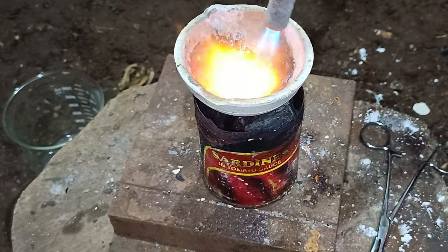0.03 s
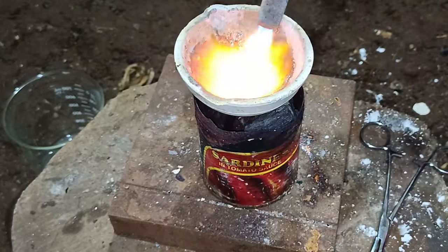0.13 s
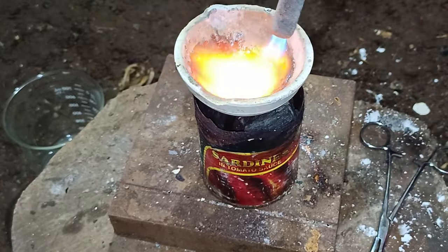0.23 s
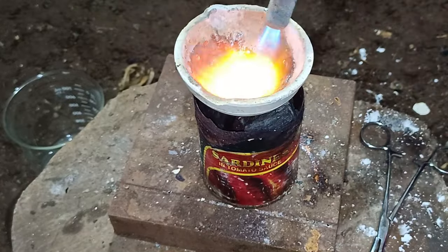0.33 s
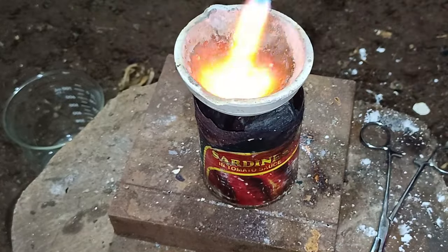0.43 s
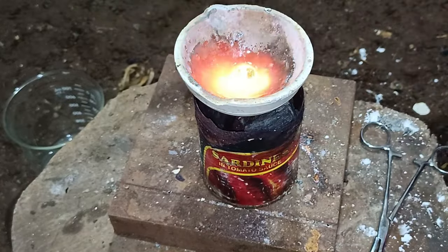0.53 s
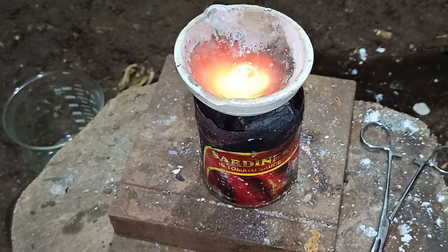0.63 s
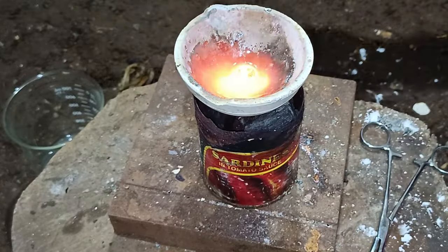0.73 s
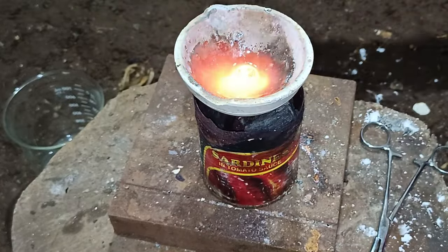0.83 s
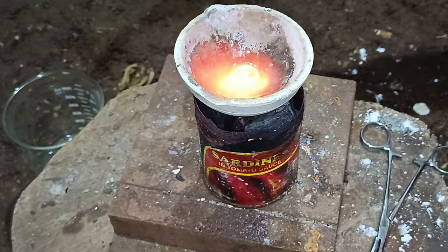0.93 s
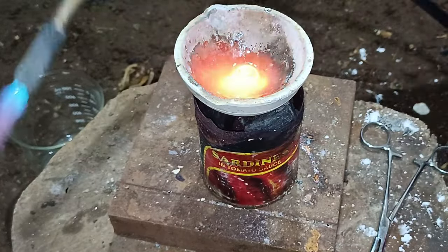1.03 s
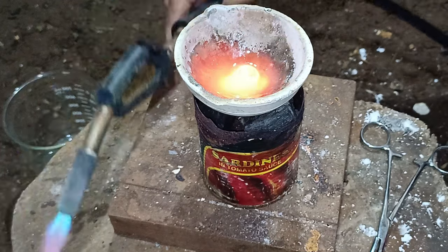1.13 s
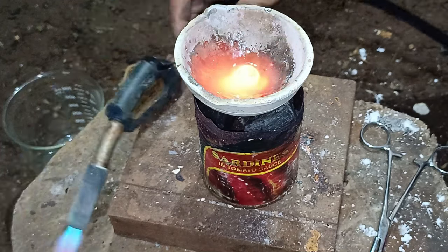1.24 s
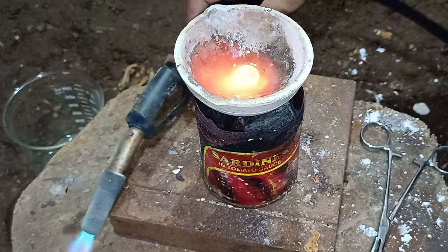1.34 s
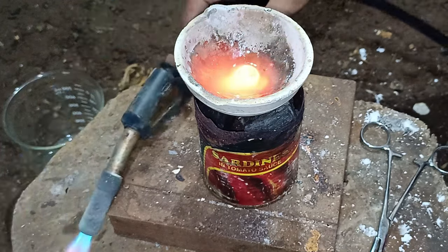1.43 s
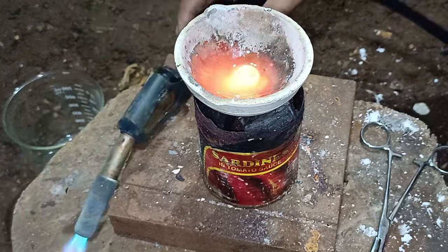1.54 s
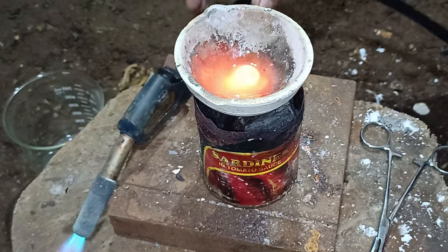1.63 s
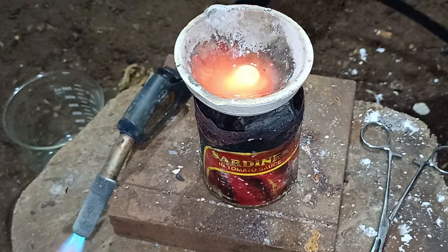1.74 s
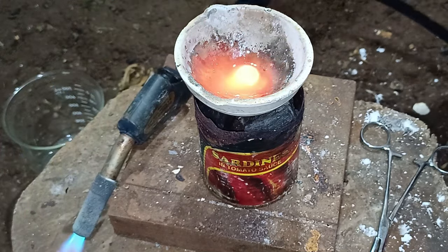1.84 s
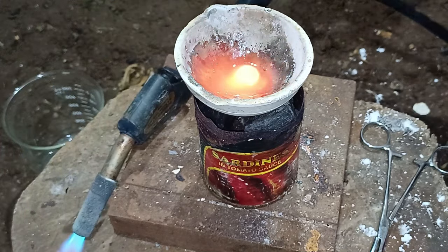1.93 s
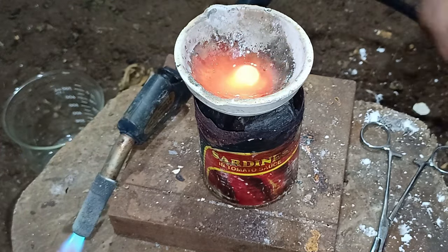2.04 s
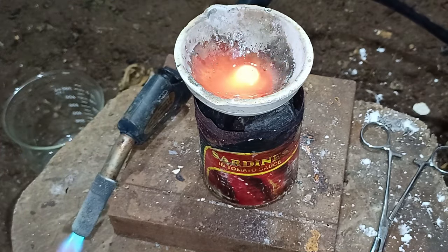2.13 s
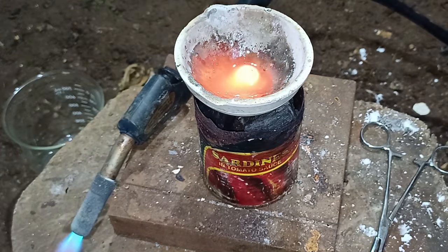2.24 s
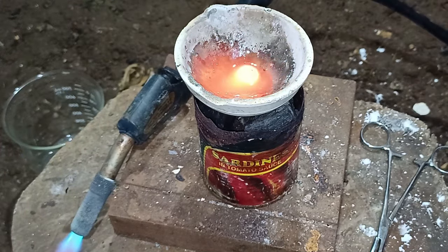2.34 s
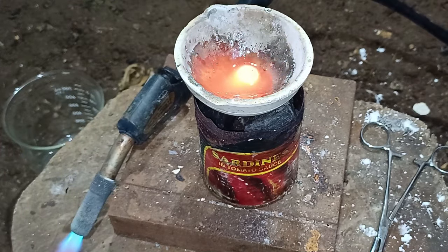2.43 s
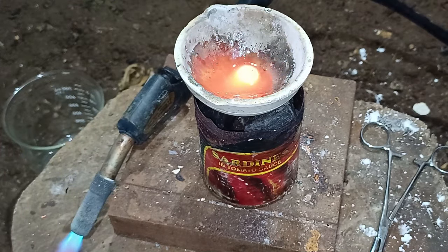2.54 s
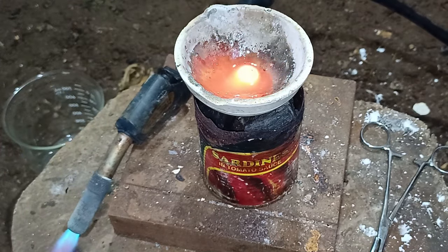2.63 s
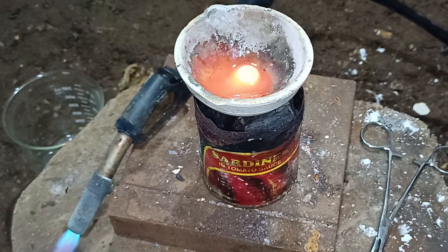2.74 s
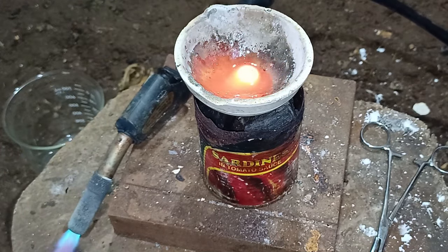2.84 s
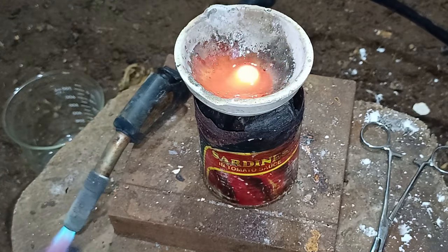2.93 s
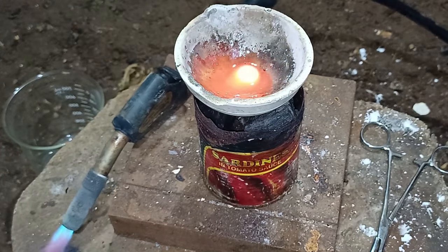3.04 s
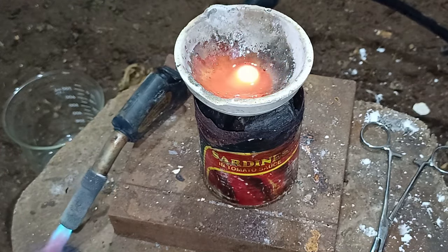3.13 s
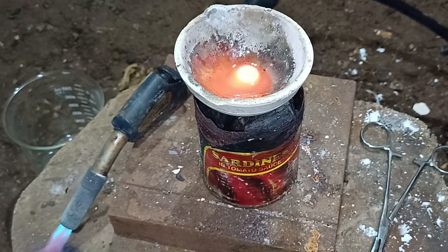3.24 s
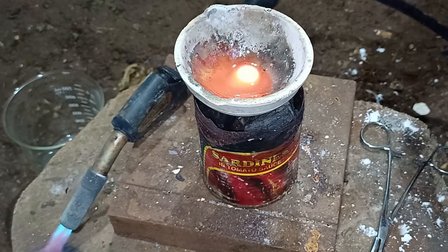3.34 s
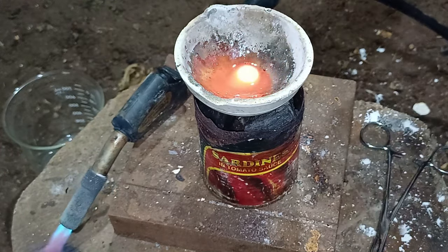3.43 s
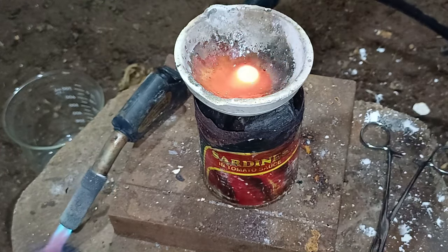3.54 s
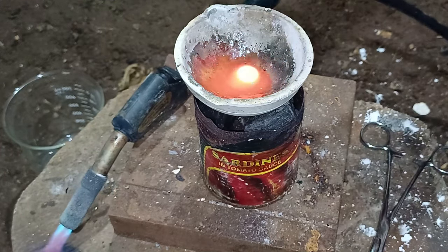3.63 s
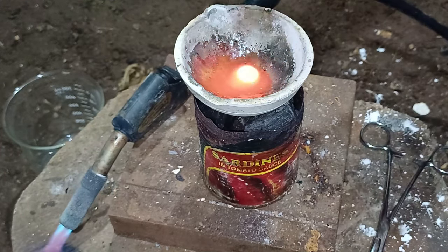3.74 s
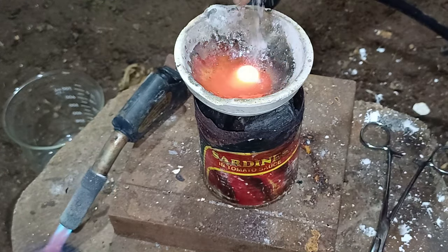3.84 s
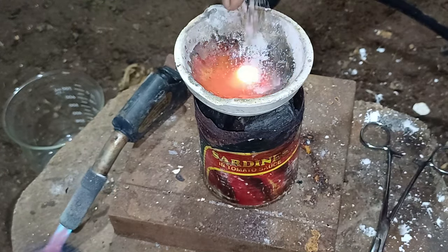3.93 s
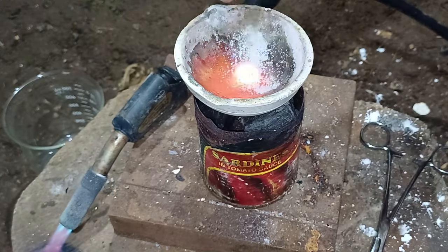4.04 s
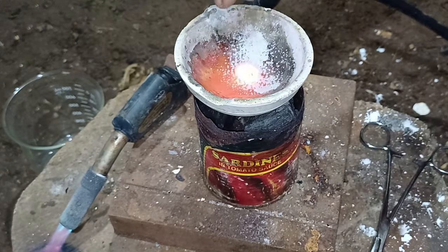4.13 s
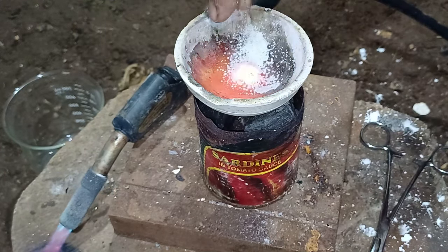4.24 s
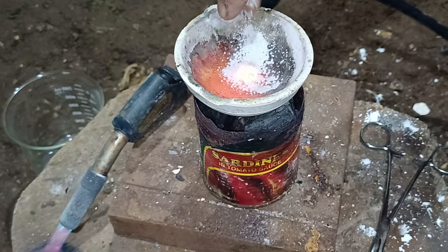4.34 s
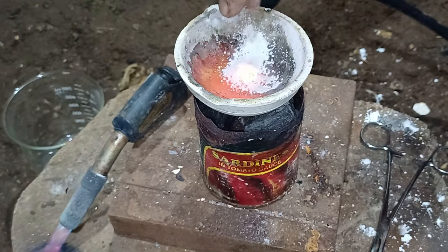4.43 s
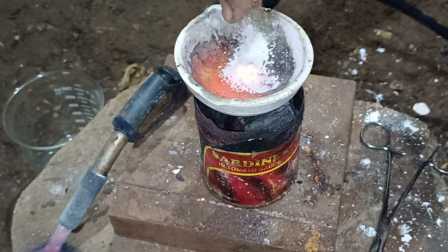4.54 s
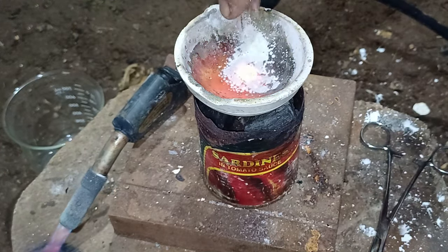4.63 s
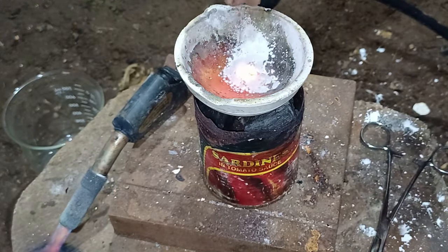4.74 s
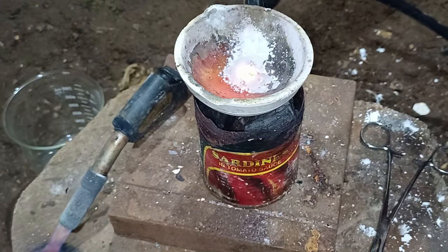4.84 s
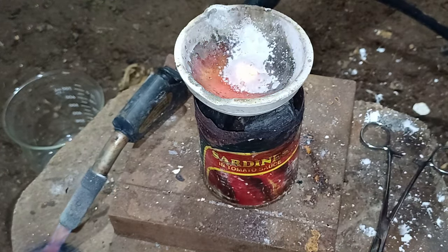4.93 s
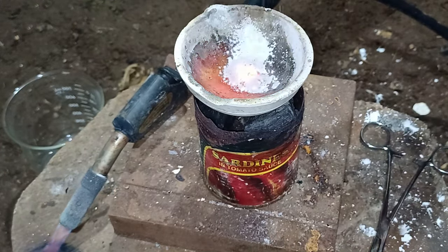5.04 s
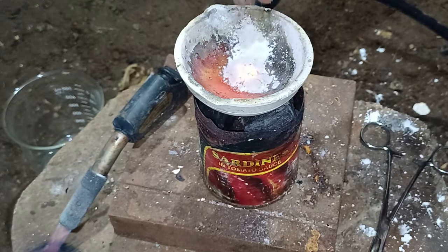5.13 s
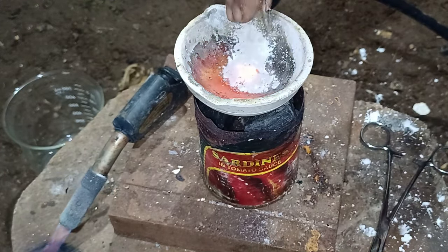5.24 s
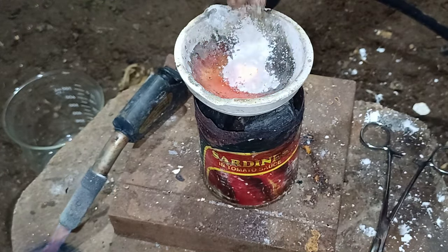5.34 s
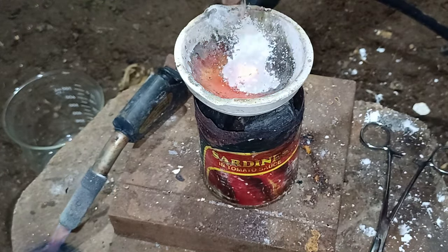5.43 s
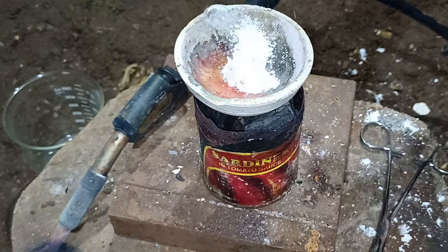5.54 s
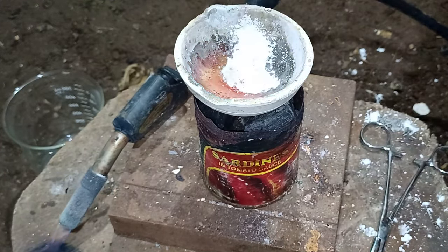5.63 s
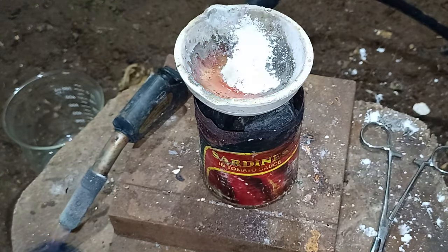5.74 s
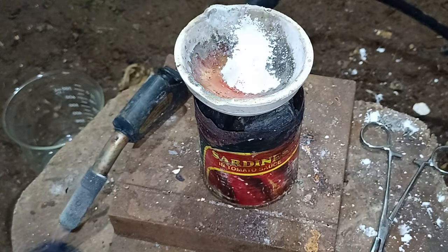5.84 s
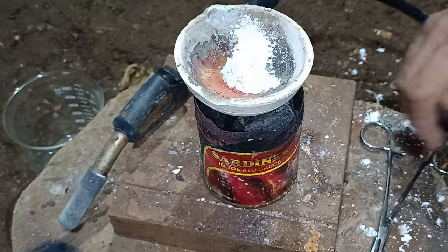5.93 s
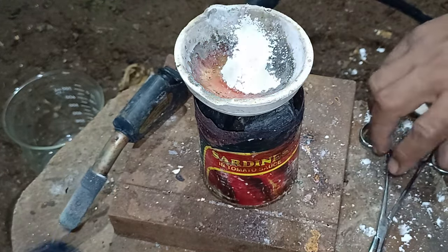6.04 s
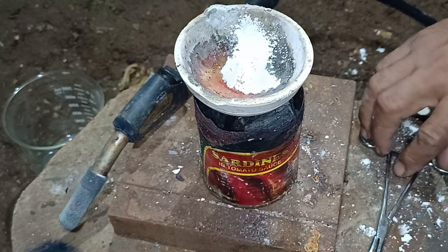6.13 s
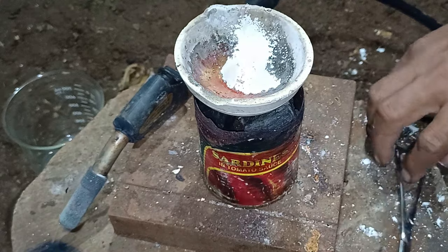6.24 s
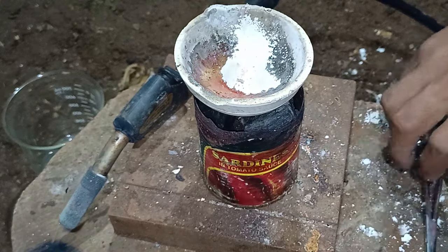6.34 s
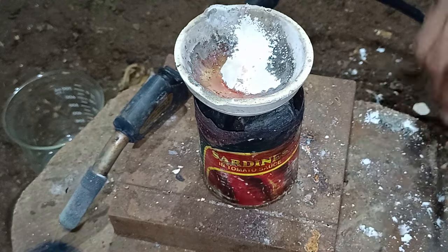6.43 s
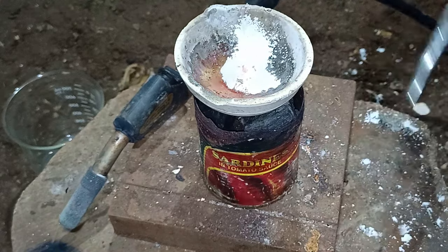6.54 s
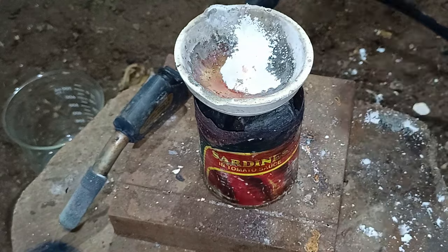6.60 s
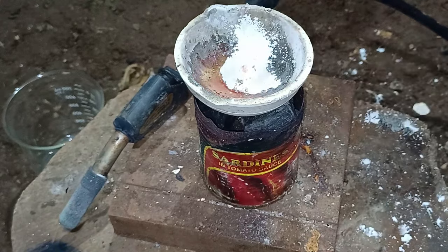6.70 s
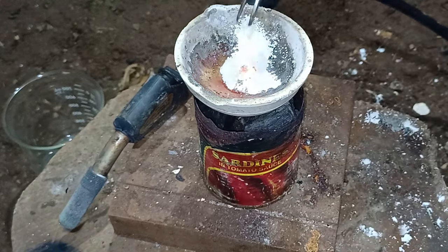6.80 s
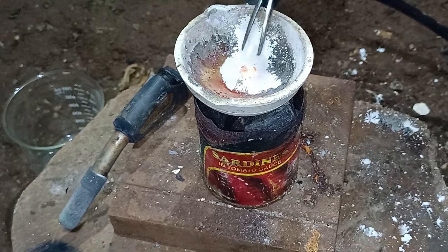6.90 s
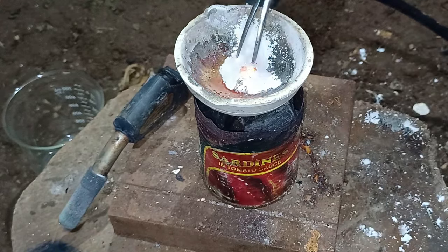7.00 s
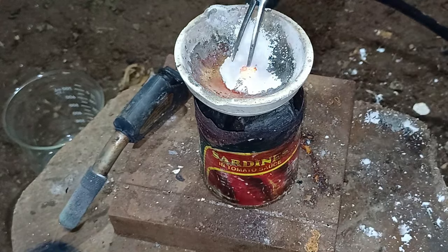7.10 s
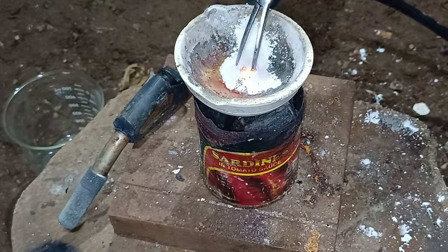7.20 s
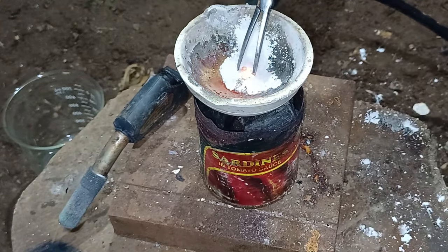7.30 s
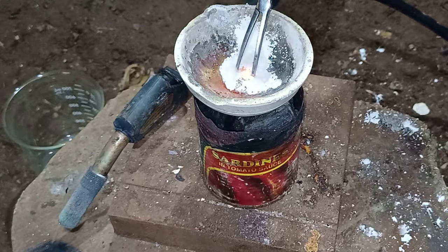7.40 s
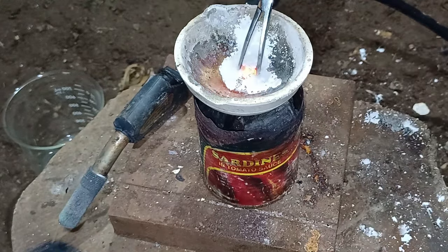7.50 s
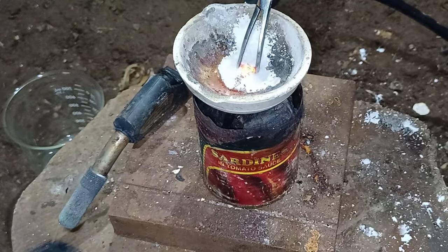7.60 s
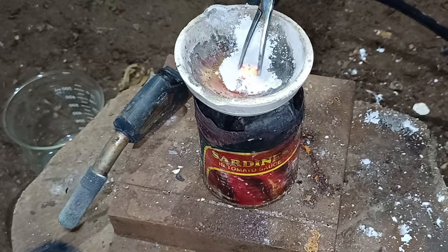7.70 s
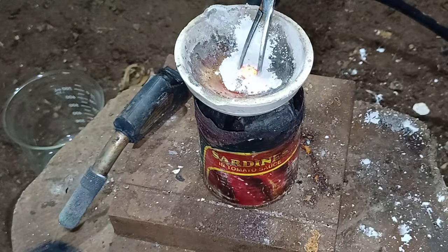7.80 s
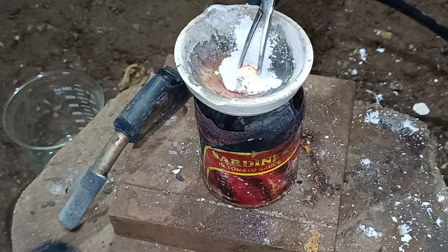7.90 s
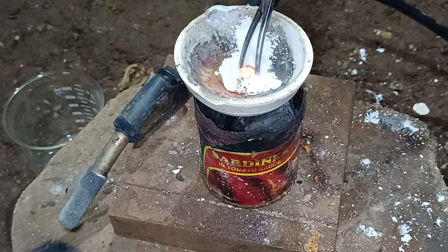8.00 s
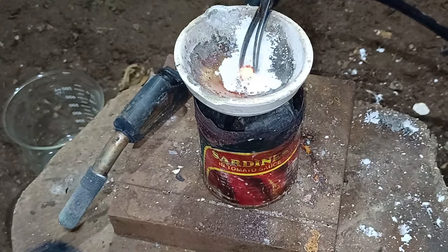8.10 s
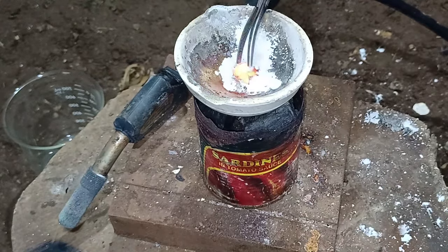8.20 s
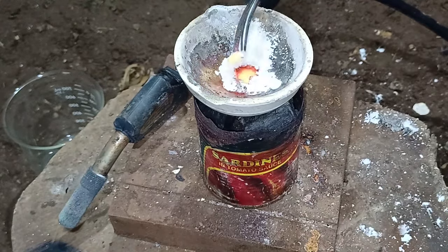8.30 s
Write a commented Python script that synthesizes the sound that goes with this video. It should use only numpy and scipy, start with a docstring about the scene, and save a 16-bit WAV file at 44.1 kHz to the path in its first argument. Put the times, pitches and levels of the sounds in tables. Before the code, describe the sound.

A gas torch roars into a crucible outdoors, close by, with a churning, flickering rush and a bright hiss. At about 0.5 seconds it spits and is swung away, turning quieter and sweeping in colour, then settles on the ground by 1.3 seconds and burns steadily. From 2.3 seconds the flame sinks, dulls and starts to flutter, with a weak, breathy note from the burner tube after 3 seconds. At 4 seconds the whole sound abruptly steps louder. The flame puffs at 4.5 seconds, and a clean, slightly falling whistle grows from 4.8 until the roar dies at 5.2 seconds. A thin, bright hiss and a low, uneven hum continue to the end, around 8.4 seconds. Tongs are picked up near 6 seconds with a deep thud, soft dull knocks and a faint scrape. More deep thuds, light scrapes and rustling come between 7.7 and 8.2 seconds.

```python
"""A gas torch roars into a crucible, then is swung away and laid on the ground. Its flame is churning
noise, coloured by the space around it. As the gas runs down the flame sinks and flutters, the whole
sound steps up, the burner tube whistles and the roar dies. A thin hiss and a low, uneven hum stay on,
with a few deep thuds and the soft knocks and scrapes of the tongs."""
import sys
import numpy as np
from scipy import signal
from scipy.fft import rfft, irfft, next_fast_len
from scipy.io import wavfile
from scipy.ndimage import uniform_filter1d

SR = 44100
rng = np.random.default_rng(int(sys.argv[2]) if len(sys.argv) > 2 else 0)


def generate_wav(signal):
    """Clip the signal to [-1, 1] and save it as 16-bit WAV at the path in sys.argv[1]."""
    frames = np.transpose(np.atleast_2d(signal))
    scaled = np.clip(frames, -1, 1) * 32767
    pcm = np.round(scaled).astype(np.int16)
    wavfile.write(sys.argv[1], SR, pcm)


N = 368676
TIME = np.arange(N) / SR
FFT_SIZE = 2 * next_fast_len(N // 2 + 1)
FREQ = np.maximum(np.fft.rfftfreq(FFT_SIZE, 1 / SR), 1)
SIDES = np.array([[1], [-1]])  # left, right: a positive pan_db is louder on the left
CUTOFF_HZ = 15900
# how much later each sound reaches the right side than the left
CRUCIBLE_LAG_S, AIR_LAG_S, FLAME_LAG_S, HISS_LAG_S = 0.0001, 0.00016, 0.00013, 0.00006

# the torch's path: time_s, place (0 crucible, 1 open air, 2 lowered, 3 ground), echo_delay_s, echo_gain
SWING = [(.41, 0.0, 0.004, .03), (.57, 0.87, 0.0042, .18), (.76, 1.0, 0.0044, 0.3), (.87, 1, .0042, 0.18),
         (.97, 2, 0.0039, .15), (1.09, 2, .0032, .17), (1.19, 3, 0.0026, 0.09), (1.33, 3, .0025, .02)]
# how alike left and right are for most noises: pitch_hz, likeness (0 to 1)
LIKENESS = [(60, 0.95), (900, 1), (2500, 0.78), (5000, 0.67), (8000, 0.04), (15000, 0.2)]
# the same for the thin hiss and the rumble around the hum: pitch_hz, likeness (0 to 1)
HISS_LIKENESS = [(170, 0.87), (300, 0.26), (1000, 0.2), (2300, 1), (5000, 0.5), (10000, 0)]


def from_db(db):
    """Turn decibels into a gain to multiply by."""
    return 10 ** (np.asarray(db) / 20)


def rms_one(x):
    """Scale a sound so that the average of its channels has strength (rms) 1."""
    return x / np.sqrt(np.mean(np.atleast_2d(x).mean(0) ** 2) + 1e-20)


def in_time(rows):
    """Join rows of (time_s, values...) into one curve for each value."""
    times, *columns = np.transpose(rows)
    return [np.interp(TIME, times, column) for column in columns]


def at_hz(points):
    """Join rows of (pitch_hz, value) into a curve over all frequencies."""
    hz, value = np.transpose(points)
    return np.interp(np.log(FREQ), np.log(hz), value)


def sounding(rows):
    """1 between the first and last time in a table, else 0."""
    return (TIME >= rows[0][0]) & (TIME <= rows[-1][0])


def ramp(start_s, length_s):
    """0 before the start, then an even rise to 1."""
    return np.clip((TIME - start_s) / length_s, 0, 1)


def swell(middle_s, length_s):
    """A rounded rise from 0 to 1 and back."""
    return np.cos(np.pi * np.clip((TIME - middle_s) / length_s, -0.5, 0.5))


def drift(rate_hz):
    """A smooth random wobble of about size 1, mostly slower than rate_hz."""
    stride, warm_up = 40, 2000
    pole = np.exp(-2 * np.pi * stride * rate_hz / SR)
    white = rng.standard_normal(N // stride + warm_up + 2)
    slow = signal.lfilter([1], [1, -2 * pole, pole * pole], white)[warm_up:]
    return np.interp(np.arange(N) / stride, np.arange(len(slow)), rms_one(slow))


def stereo_phase(hz, lead_rad):
    """The running angle of a moving pitch, with the left side ahead by lead_rad."""
    return 2 * np.pi * np.cumsum(hz) / SR + SIDES * lead_rad / 2


def band(x, low_hz, high_hz):
    """The part of a sound between two frequencies."""
    return irfft(rfft(x, FFT_SIZE) * ((FREQ >= low_hz) & (FREQ < high_hz)))[..., :N]


def resonances(modes):
    """Left and right power at each frequency, with a peak wherever something rings."""
    return sum(from_db(db + SIDES * pan_db / 2) ** 2
               / (1 + (np.sqrt(2) - 1) * (2 * (FREQ - hz) / width_hz) ** 2) ** 2
               for hz, width_hz, db, pan_db in modes)


def hollows(dips):
    """Power at each frequency, with narrow dips where echoes cancel the direct sound."""
    return from_db(sum(db / (1 + (2 * (FREQ - hz) / width_hz) ** 2) ** 2
                       for hz, width_hz, db in dips)) ** 2


def noise(power, lag_s, likeness=LIKENESS, scatter=0.54, scatter_s=0.0062):
    """Stereo noise of strength 1, coloured by a power curve; the left side hears it first."""
    middle, side = rfft(rng.standard_normal((2, FFT_SIZE)))
    alike = np.clip(at_hz(likeness), 0, 1)
    spectrum = np.sqrt(1 + alike) * middle + SIDES * np.sqrt(1 - alike) * side
    # small things nearby reflect the short waves and ripple the spectrum, most around 4 kHz
    echoes = rng.standard_normal((2, N)) * TIME * np.exp(-TIME / scatter_s)
    echoes = echoes / np.linalg.norm(echoes[0])
    ripple = 1 + scatter * np.minimum(FREQ / 4000, 4000 / FREQ) * rfft(echoes, FFT_SIZE)
    delay = np.exp(1j * np.pi * FREQ * lag_s * SIDES)
    return rms_one(irfft(np.sqrt(power) * ripple * spectrum * delay)[:, :N])


def place_shares():
    """How much the flame is in the crucible, in open air, lowered and on the ground, each 0 to 1."""
    place = np.clip(in_time(SWING)[0], 0, 3)
    return np.array([np.maximum(1 - abs(place - k), 0) for k in range(4)])


def drive_db(aim_db=-3.5, aim_s=0.22, run_down_s=2.295, empty_s=5.385):
    """The flame's strength: it grows as it is aimed, holds, then sinks as the gas runs out."""
    flow = np.maximum(1 - ramp(run_down_s, empty_s - run_down_s), 1e-4)
    return 20 * np.log10(flow) + aim_db * (1 - ramp(0, aim_s))


def flame_bands(shares):
    """Burning gas as low rumble, middle roar and high rush, coloured by each place it passes."""
    # resonances of the flame in each place: pitch_hz, width_hz, level_db, pan_db
    in_crucible = [(290, 60, -0.5, 1), (446, 170, 3, 2), (540, 70, -3.5, -6), (827, 52, 0.5, 1),
                   (1120, 160, 1.5, 1), (1460, 300, 1, -1.5), (1730, 170, 2.5, -4), (2284, 146, 4.5, -1.5),
                   (2790, 110, 0, -4), (3080, 810, -0.5, -2.5), (4200, 510, -10, 0),
                   (5650, 8700, -16.5, -5)]
    in_air = [(176, 110, 0, 1), (440, 125, 4.5, 3), (555, 80, 3, -1), (890, 460, -3.5, -0.5),
              (1390, 310, -2.5, -0.5), (2660, 2000, -8, -1.5), (5500, 1300, -17.5, 3)]
    lowered = [(432, 85, 1, 4), (570, 280, -2.5, 0), (1180, 310, -3.5, -1), (1560, 150, -6, 0),
               (2260, 270, -6.5, 1.5), (3580, 1200, -12.5, -2), (5300, 930, -15, 0)]
    on_ground = [(267.5, 50.5, -1.3, 2.5), (434, 93, -3, 2.5), (627, 250, -3.5, 2), (677, 72, 0, 1.5),
                 (920, 120, -8.5, -13.5), (1245, 133, -7.5, 12), (1477, 740, -6.5, -1), (1550, 170, -7, 5),
                 (2170, 66, -8, 13), (2362, 112, -7, -7.5), (3200, 730, -13.5, -8.5), (3540, 270, -17, 9),
                 (4330, 460, -17.5, 0.5), (4900, 860, -18, -2.5), (5700, 410, -18.5, -2.5),
                 (6630, 610, -20, -2)]
    # dips between the resonances on the ground: pitch_hz, width_hz, change_db
    ground_dips = [(325, 51, -6), (773, 62, -4.5), (1012, 100, -4.5), (1870, 89, -2.5)]
    colours = [resonances(in_crucible), resonances(in_air), resonances(lowered),
               resonances(on_ground) * hollows(ground_dips)]
    lags_s = [CRUCIBLE_LAG_S, AIR_LAG_S, AIR_LAG_S, FLAME_LAG_S]
    edges_hz = [(75, 800), (800, 2600), (2600, SR)]
    bands = 0
    for share, colour, lag_s in zip(shares, colours, lags_s):
        burning = noise(colour, lag_s)
        bands += np.sqrt(share) * np.array([rms_one(band(burning, *edges)) for edges in edges_hz])
    return bands


def flame_levels_db(shares):
    """Levels of rumble, roar and rush: with less gas the flame gets quieter and duller."""
    # the flame at full flow, one row for each place: rumble_db, roar_db, rush_db
    place_levels = [(-22, -17, -24.5), (-26, -27, -33.5), (-23.5, -25.5, -31), (-22, -20, -29.5)]
    # decibels gained for each decibel of gas flow: rumble, roar, rush
    flow_slopes = [0.84, 1.55, 1.345]
    # a flare on leaving the crucible, a puff when starved: middle_s, length_s, rumble_db, roar_db, rush_db
    flares = [(0.5, 0.24, 2, 1.3, -4.5), (4.548, 0.033, 3.6, 2.9, 4)]
    # the starved flame draws back into the tube, one row for each band: start_s, length_s, change_db
    retreat = [(4.56, 0.39, -12.5), (4.73, 0.081, 5.5), (4.74, 0.2, 9.5)]
    levels = np.transpose(place_levels) @ shares + np.outer(flow_slopes, drive_db())
    levels += sum(np.outer(db, swell(middle_s, length_s)) for middle_s, length_s, *db in flares)
    levels += np.array([db * ramp(start_s, length_s) for start_s, length_s, db in retreat])
    going_out_db = np.outer([-5, -11, -6], ramp(start_s=5.15, length_s=0.06))
    return levels + going_out_db


def flame(flicker_db=0.92, flutter_db=0.8, splash_db=0.8, band_flicker_db=0.78, shade_db=-5.5):
    """The roar flickers, more so as it splashes in the crucible and as it starves of gas."""
    shares = place_shares()
    bands = flame_bands(shares)
    starved = ramp(start_s=3.5, length_s=1.1)
    wobble_db = flicker_db * drift(51) + flutter_db * starved * drift(43.2)
    wobble_db += splash_db * shares[0] * drift(90)
    roar = sum(part * from_db(db + wobble_db + band_flicker_db * drift(34))
               for part, db in zip(bands, flame_levels_db(shares)))
    # the hand blocks some of the treble until it lets go of the torch
    held = 1 - ramp(start_s=1.48, length_s=0.08)
    roar -= band(roar, 5680, SR) * (1 - from_db(shade_db * held))
    return ground_echoes(roar, airborne=shares[1])


def ground_echoes(roar, airborne, wander=0.022):
    """Echoes off the slab and the ground shift as the torch is carried, sweeping the roar's colour."""
    _, delay_s, gain = in_time(SWING)
    delay_s = delay_s * (1 + wander * airborne * drift(8.7))
    echoes = np.array([np.interp(TIME - delay_s / 2, TIME, side) + np.interp(TIME - delay_s, TIME, side)
                       for side in roar])
    return (roar + gain * echoes) / np.sqrt(1 + 2 * gain ** 2)


def gas_jet(full_flow_db=-37.5, flow_slope=1.56, in_air_db=-1.5, spit_db=5.5, flicker_db=1.43):
    """The nozzle's bright hiss follows the gas flow, and is weaker while swung through the air."""
    # broad peaks of the jet's hiss: pitch_hz, width_hz, level_db, pan_db
    humps = [(7400, 1800, -1.5, -5), (10220, 1700, -0.5, 4), (12700, 3100, 0, 0)]
    jet = noise(resonances(humps), FLAME_LAG_S)
    db = full_flow_db + flow_slope * drive_db() + in_air_db * place_shares()[1]
    db += spit_db * swell(middle_s=0.483, length_s=0.069)  # it spits on crossing the crucible's rim
    return jet * from_db(db + flicker_db * drift(50))


def tube_rush(boost_db=5.5):
    """Gas rushes through the starved burner tube and stirs its resonances."""
    # loudness of the rush before the boost: time_s, level_db
    levels = [(2.9, -48), (3.6, -42), (4.3, -41), (4.74, -51), (4.81, -41.5), (4.99, -46.5), (5.18, -58.5)]
    # resonances of the tube: pitch_hz, width_hz, level_db, pan_db
    modes = [(250, 58, 10.5, 4.5), (907, 81, 14, -9), (2410, 135, 11, 0.5), (4420, 260, 5, -4),
             (5680, 220, 5.5, -3), (5950, 92, 8, 1), (7070, 260, -1, -8)]
    rush = noise(resonances(modes), FLAME_LAG_S)
    return rush * sounding(levels) * from_db(in_time(levels)[0] + boost_db + drift(42))


def tube_tone(waver_hz=16, flicker_db=4.3, pan_db=-3.5):
    """The burner tube sings a weak, breathy note inside the roar."""
    # the course of the note: time_s, pitch_hz, level_db
    note = [(2.9, 996, -52), (3.25, 969.4, -34), (3.6, 941, -36), (3.97, 965.6, -34.5), (4.2, 958, -35),
            (4.39, 934, -32.5), (4.5, 911.4, -49)]
    hz, db = in_time(note)
    gain = sounding(note) * from_db(db + flicker_db * drift(28) + SIDES * pan_db / 2)
    return np.sqrt(2) * gain * np.sin(stereo_phase(hz + waver_hz * drift(40.7), lead_rad=0.71))


def tube_whistle(waver_hz=2.3, flicker_db=0.5, pan_db=-4.5, third_vs_second_db=-16):
    """The tube locks into a clean, falling whistle just before the flame dies."""
    # the course of the whistle: time_s, pitch_hz, level_db, overtone_db (relative to the main note)
    note = [(4.75, 1028, -52, -12), (4.86, 1006, -39, -14), (4.93, 1002, -33.5, -4.5),
            (5.055, 980, -29, -8), (5.095, 970, -27, -26), (5.148, 957, -25.5, -24), (5.185, 944, -51, -30)]
    hz, db, overtone_db = in_time(note)
    phase = stereo_phase(hz + waver_hz * drift(40), lead_rad=0.71)
    overtones = np.sin(2 * phase) + from_db(third_vs_second_db) * np.sin(3 * phase)
    gain = sounding(note) * from_db(db + flicker_db * drift(28) + SIDES * pan_db / 2)
    return np.sqrt(2) * gain * (np.sin(phase) + from_db(overtone_db) * overtones)


def thin_hiss(body_db=-51, top_rustle_db=-3, top_pan_db=0.5, body_pan_db=-1,
              flicker_db=1.34, sway_db=0.5):
    """A smooth, bright hiss outlasts the flame and swells as the tongs rustle."""
    # overall colour of the hiss: pitch_hz, level_db
    colour = [(300, -8), (700, -20), (1400, -10.5), (2000, -5), (3200, -2.5), (4800, -7), (7500, -6.5),
              (8800, -2), (11000, 0.5), (15800, -1.5)]
    # narrow resonances on top of that colour: pitch_hz, width_hz, level_db, pan_db
    peaks = [(1730, 140, 0.5, -10.5), (2290, 95, 7.5, -0.5)]
    # loudness of the top of the hiss: time_s, level_db
    top_levels = [(3.9, -53), (4.02, -46), (5.0, -44.5), (5.7, -47.5), (8.36, -46)]
    # the tongs are picked up and worked in the powder: middle_s, length_s, level_db
    rustles = [(6.2, 0.53, -57), (8.018, 0.92, -50.5)]
    hiss = noise(from_db(at_hz(colour)) ** 2 * (1 + resonances(peaks)), HISS_LAG_S, HISS_LIKENESS)
    rustle = sum(from_db(db) * swell(middle_s, length_s) for middle_s, length_s, db in rustles)
    body = rms_one(band(hiss, 0, 6000)) * from_db(SIDES * body_pan_db / 2)
    body *= np.hypot(from_db(body_db), rustle)
    top = rms_one(band(hiss, 6000, CUTOFF_HZ)) * from_db(SIDES * top_pan_db / 2)
    top *= np.hypot(from_db(in_time(top_levels)[0]), from_db(top_rustle_db) * rustle)
    return (top + body) * from_db(flicker_db * drift(75) + sway_db * drift(10.4))


def hum(tone_db=-1.1, rough_db=-2, rumble_db=-47, rumble_follows=0.29,
        waver_hz=2.45, uneven_db=1.4, pan_db=1):
    """A low hum in a wide rumble: rough at first, it clears to a wavering tone as the flame weakens."""
    # swells of the hum: time_s, level_db
    levels = [(3.96, -36.5), (4.51, -47), (4.55, -29), (4.63, -37), (4.72, -33), (4.98, -41.5),
              (5.3, -47.5), (5.55, -44.5), (5.85, -53), (6.0, -41), (6.22, -40), (6.27, -51), (6.35, -36.5),
              (6.41, -46), (6.5, -37), (6.55, -51), (6.6, -32), (6.66, -39), (6.7, -34), (6.87, -36.5),
              (7.02, -31.5), (7.1, -41.5), (7.25, -50), (7.44, -36), (7.51, -46), (7.56, -36.5),
              (7.98, -31), (8.07, -41), (8.28, -35.5), (8.36, -35)]
    # its sagging pitch: time_s, pitch_hz
    pitches = [(5.6, 130.5), (6.8, 125.1), (7.8, 121)]
    # colour of the rumble around it: pitch_hz, level_db
    colour = [(20, -14), (85, -1), (140, 6), (185, -8), (230, -8), (320, -13), (390, -25.5), (900, -55)]
    db, = in_time(levels)
    phase = stereo_phase(in_time(pitches)[0] + waver_hz * drift(20.2), lead_rad=0.3)
    tone = np.sqrt(2) * np.sin(phase) * from_db(tone_db + uneven_db * drift(22))
    slow_swell_db = uniform_filter1d(db - db.mean(), size=SR // 5)
    rumble = noise(from_db(at_hz(colour)) ** 2, HISS_LAG_S, HISS_LIKENESS)
    rumble *= from_db(rumble_db + rumble_follows * slow_swell_db)
    rough = from_db(rough_db) * noise(resonances([(133.4, 39, 0, 0)]), FLAME_LAG_S)
    clear = ramp(start_s=4.45, length_s=0.2)
    return from_db(db + SIDES * pan_db / 2) * (clear * tone + (1 - clear) * rough) + rumble


def throb(pitch_hz=60, waver_hz=3.24, thud_trim_db=-2.5, rise_s=0.019, uneven_db=2.3, rumble_db=-58):
    """A faint throb about an octave below the hum; each thud lifts it quickly, holds and dies away."""
    # loudness of the throb between thuds: time_s, level_db
    levels = [(6.5, -60), (6.95, -46.5), (8.36, -56)]
    # deep thuds as the tongs are handled: start_s, level_db, hold_s, fade_s (time to fall 60 dB)
    thuds = [(5.954, -31.5, 0.11, 0.73), (6.183, -43, 0.067, 0.49), (7.742, -27.5, 0.033, 0.33),
             (7.852, -32.5, 0.089, 0.39), (8.096, -38, .04, 0.3)]
    lift = 0
    for start_s, db, hold_s, fade_s in thuds:
        fallen_db = 60 * np.maximum(TIME - start_s - hold_s, 0) / fade_s
        lift += ramp(start_s, rise_s) * from_db(db + thud_trim_db - fallen_db)
    tone = np.sqrt(2) * np.sin(stereo_phase(pitch_hz + waver_hz * drift(19.5), lead_rad=0.47))
    rumble = from_db(rumble_db) * noise(resonances([(58, 38, 0, 0)]), HISS_LAG_S)
    gain = np.hypot(from_db(in_time(levels)[0]), lift) * from_db(uneven_db * drift(29))
    return rumble + band(tone * gain, 40, 92)


def knocks(fade_s=0.07, rise_s=0.003):
    """Each touch of the tongs rings one short, dull note."""
    # soft knocks of handling: start_s, level_db, pitch_hz
    touches = [(5.983, -44, 270), (6.031, -45, 570), (6.182, -52, 575), (6.279, -48, 550)]
    out = np.zeros((2, N))
    age = np.arange(SR // 4) / SR
    shape = from_db(-60 * age / fade_s) * (1 - np.exp(-age / rise_s))
    for start_s, db, hz in touches:
        start = round(start_s * SR)
        out[:, start:start + len(age)] += from_db(db) * shape * np.sin(2 * np.pi * hz * age)
    return out


def scrapes(grit_db=1.5):
    """The tongs rub on the slab and in the crucible; each gritty stroke swells and fades."""
    # strokes of the tongs: middle_s, length_s, level_db
    strokes = [(6.203, 0.43, -65), (7.725, 0.051, -58), (8.0, .14, -60)]
    # dull resonances they stir: pitch_hz, width_hz, level_db, pan_db
    modes = [(740, 350, -6.5, 0), (1140, 190, 1, 0)]
    rubbing = noise(resonances(modes), HISS_LAG_S)
    gain = sum(from_db(db) * swell(middle_s, length_s) for middle_s, length_s, db in strokes)
    return rubbing * gain * from_db(grit_db * drift(80))


def scene():
    """Torch, hiss, hum and handling together; the scrapes are two layers of the same strokes."""
    torch = flame() + gas_jet() + tube_rush() + tube_tone() + tube_whistle()
    return torch + thin_hiss() + hum() + throb() + knocks() + scrapes() + scrapes()


def record(dry):
    """Everything is 10 dB quieter until the level steps up; the deepest bass and very top are cut."""
    step_s, step_db = 3.956, 10
    return band(dry * from_db(-step_db * (TIME < step_s)), 24, CUTOFF_HZ)


dry = scene()
out = record(dry)
generate_wav(out)
```